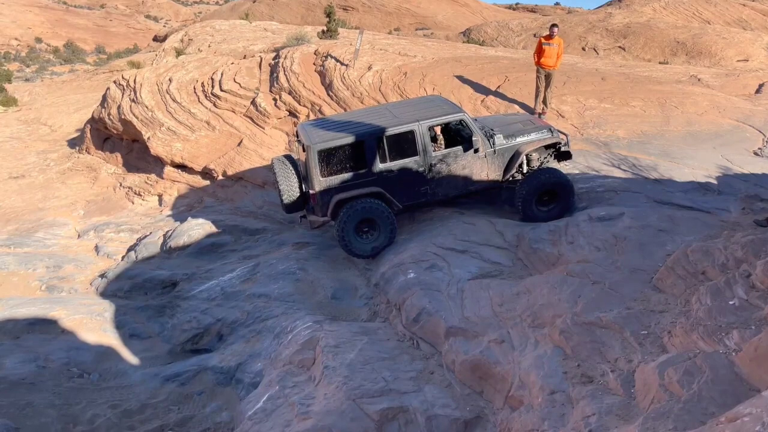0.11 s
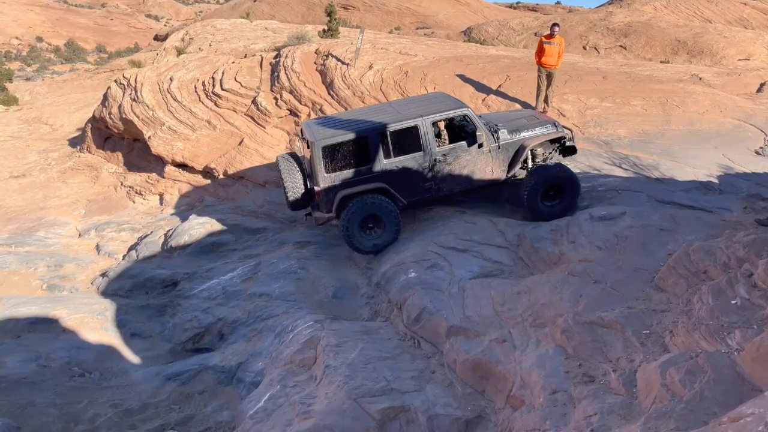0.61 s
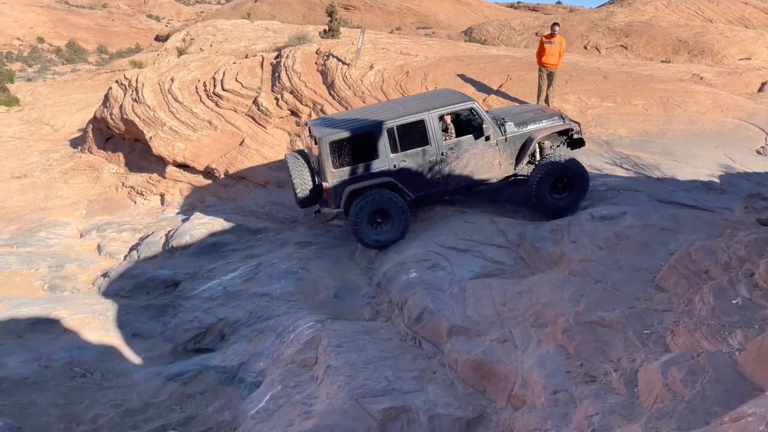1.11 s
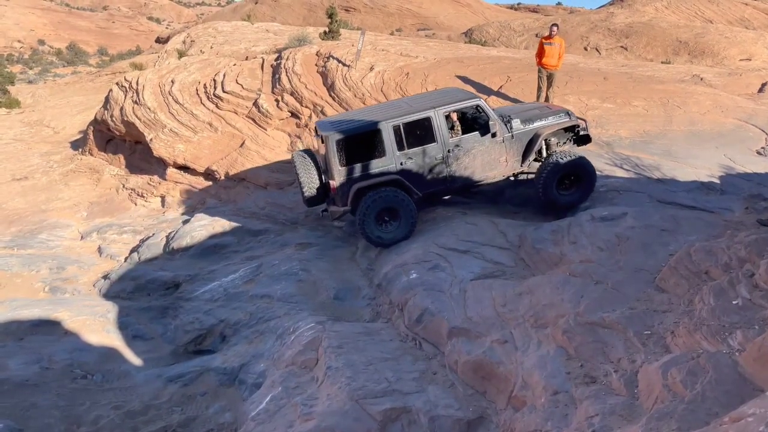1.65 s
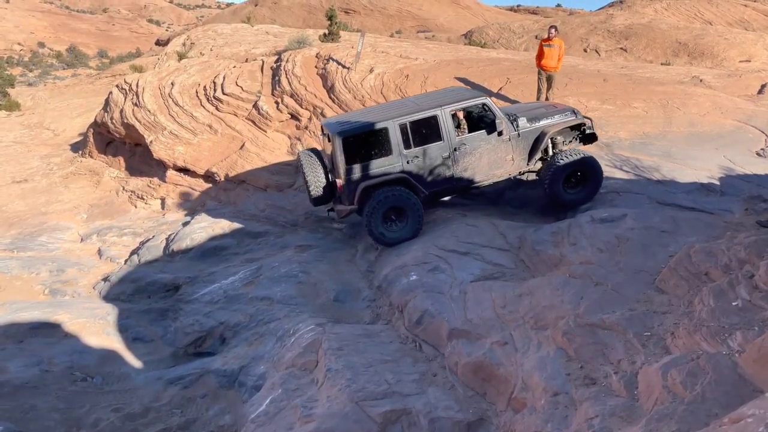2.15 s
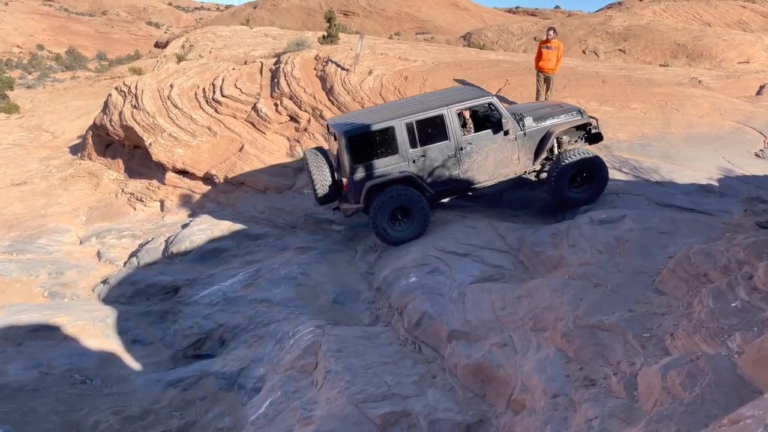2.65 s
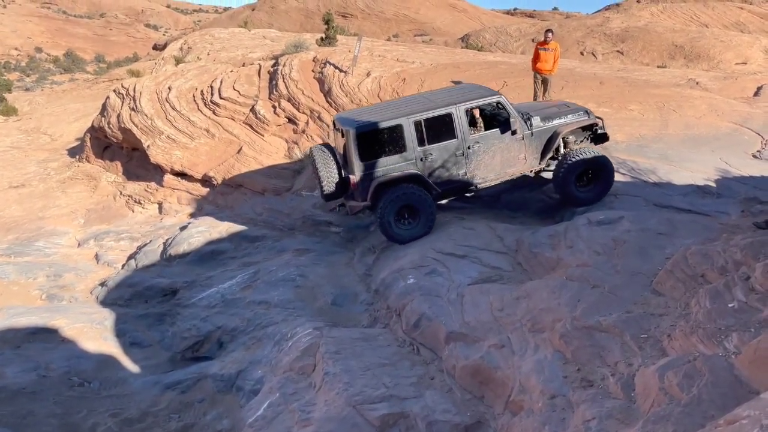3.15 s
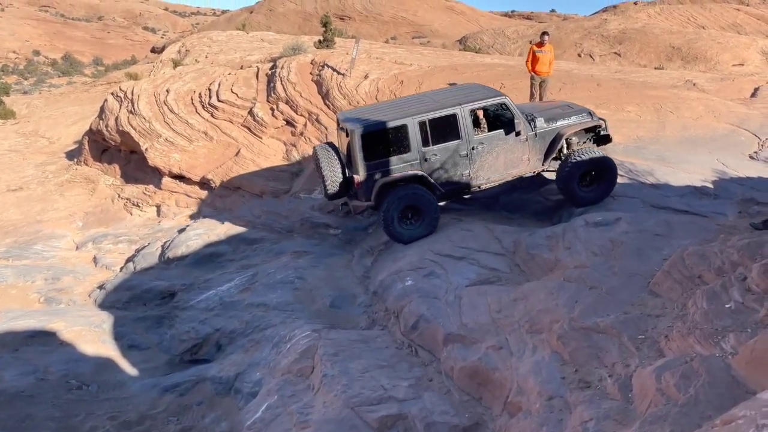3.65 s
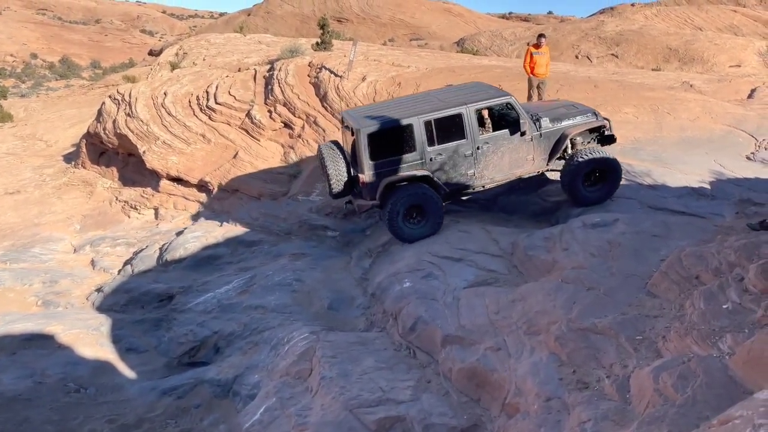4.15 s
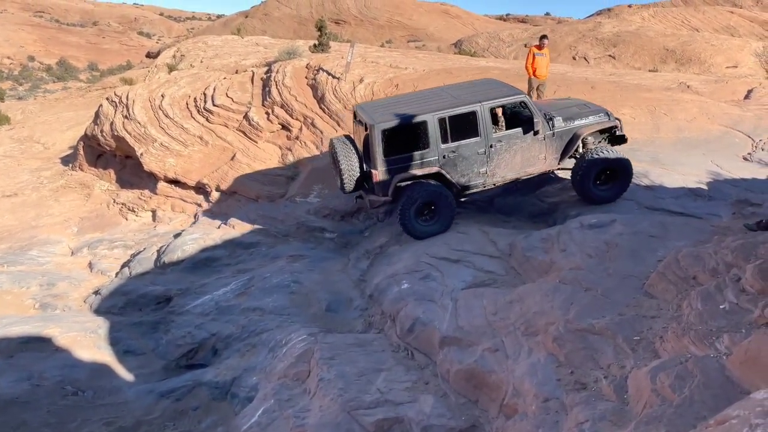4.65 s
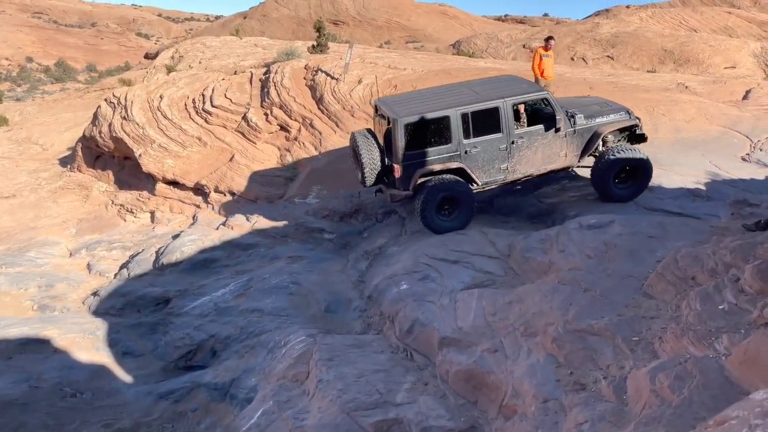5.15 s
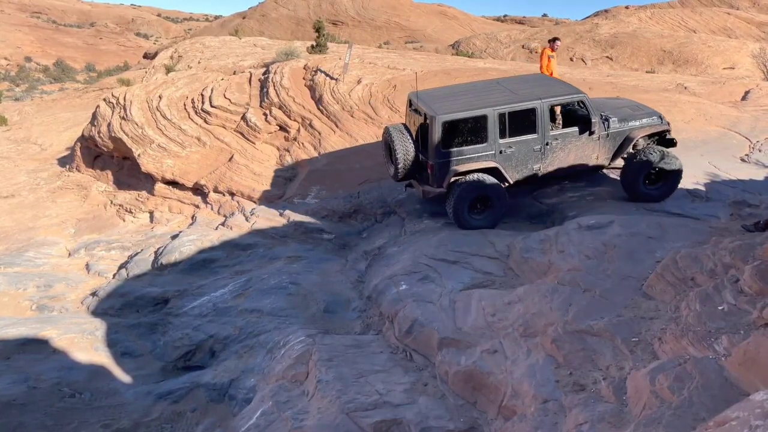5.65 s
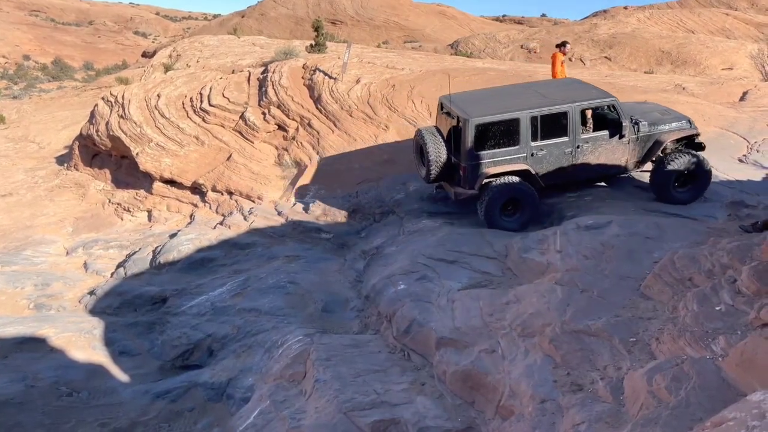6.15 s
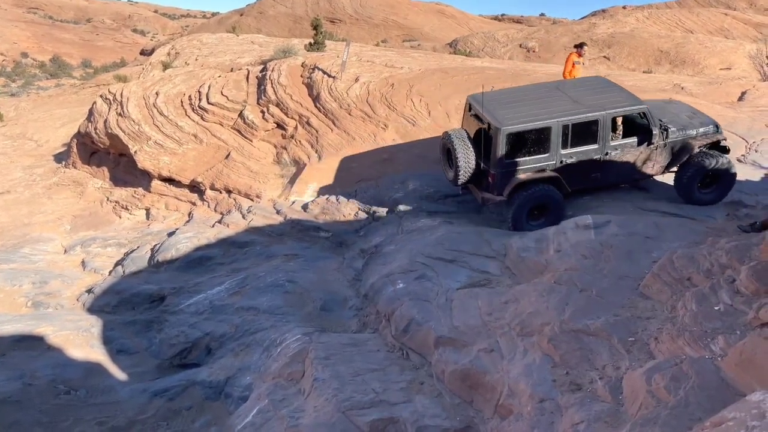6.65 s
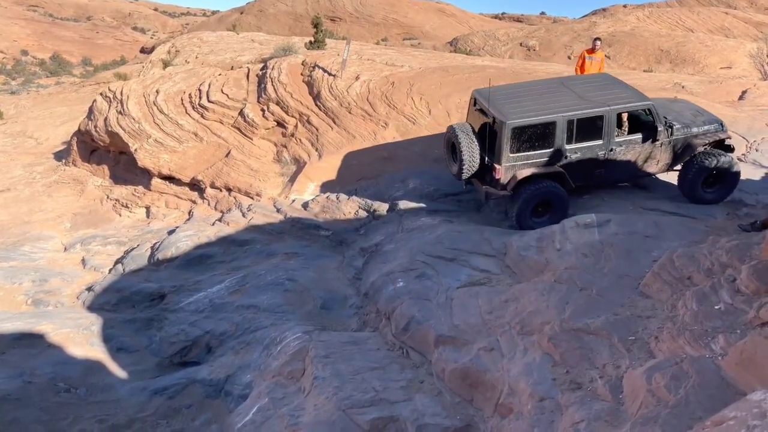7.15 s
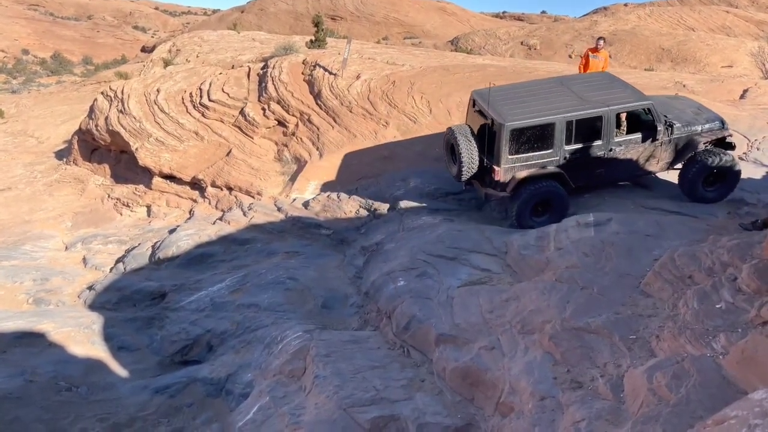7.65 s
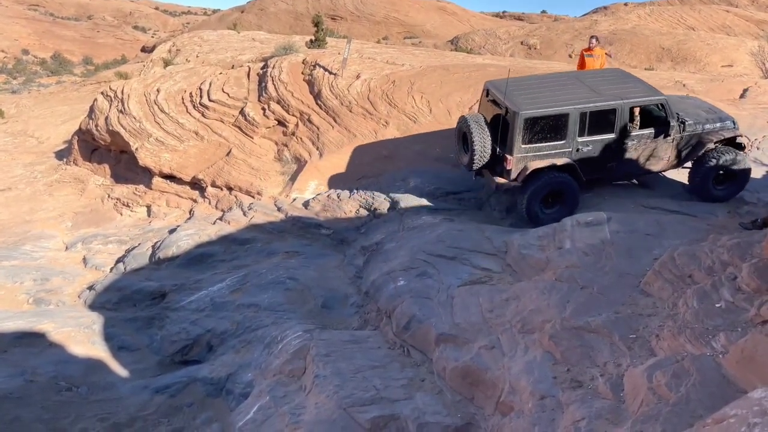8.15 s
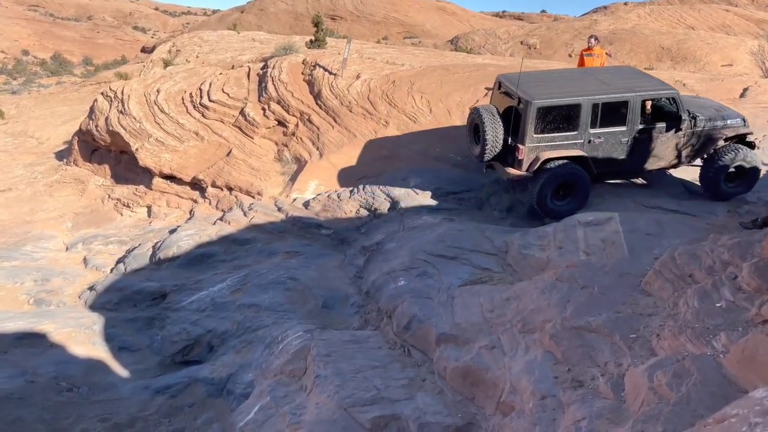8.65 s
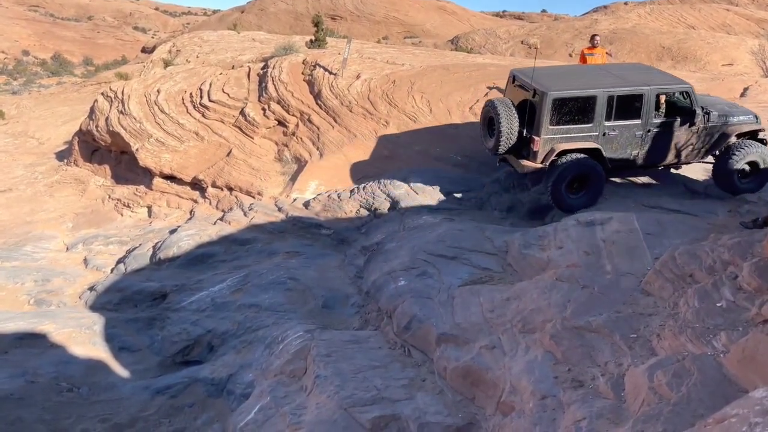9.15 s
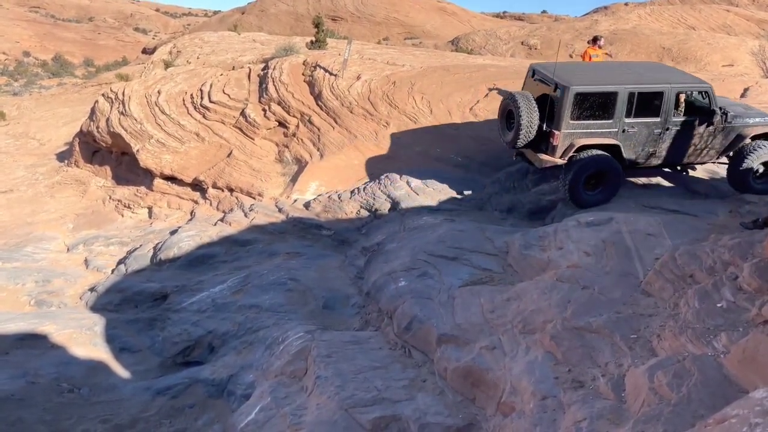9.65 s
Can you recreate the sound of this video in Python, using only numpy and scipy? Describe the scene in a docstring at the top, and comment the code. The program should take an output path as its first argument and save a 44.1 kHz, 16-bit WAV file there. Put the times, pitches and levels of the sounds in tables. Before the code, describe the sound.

Outdoors on open rock, an off-road vehicle labours with a deep, throbbing exhaust boom, engine whir and faint panel buzz. Wind thumps and flutters on the microphone. Near six seconds the boom dies away and the underbody knocks and scrapes rock, followed by small grit ticks. After a quieter gap the engine picks up again, lower in level, then eases off.

```python
"""An exhaust booms close by as a four-wheel drive labours up a rock ledge; it lifts off, clunks over, pulls again.
The boom, at twice the firing rate, and its fractions are sines locked to the crank. The engine bay whirs
in shaped noise and buzzing panels; contacts with the rock are noise bursts through the underbody's resonances,
grit ticks are short rough rings. Gusts of lumpy low noise buffet the two microphone ports, with single pops."""
import sys
import numpy as np
from scipy import signal
from scipy.fft import rfft, irfft, next_fast_len
from scipy.io import wavfile
from scipy.ndimage import uniform_filter1d, map_coordinates

SR = 44100
rng = np.random.default_rng(int(sys.argv[2]) if len(sys.argv) > 2 else 0)


def persist_wave(psi):
    """Save psi, clipped to +-1, as 16-bit WAV."""
    counts = np.round(np.clip(psi, -1, 1) * 32767).astype(np.int16)
    wavfile.write(sys.argv[1], SR, np.atleast_2d(counts).T)


def gain_from_db(level_db):
    """Turn a decibel level (scalar or array-like) into a linear amplitude factor."""
    decades = np.asarray(level_db, float) / 20
    return 10 ** decades


N = 431298

# driveline strain through the climb: t/s, level/dB
STRAIN = [(0, -1.5), (1.2, -7), (3.4, -2), (3.9, 1.5), (4.4, 2), (4.8, 0), (5.3, 2), (5.7, -2), (7.3, -9),
          (7.8, -5), (8.6, -7), (9.05, -9.5), (9.7, -2)]
# resonances of the underbody: f/Hz, width/Hz, relative level/dB
UNDERBODY = [(782, 25, 5), (950, 30, 4), (1615, 46, 0), (2340, 60, -0.5), (2600, 110, -6.5),
             (2894, 16, 1.5), (3270, 60, -8.5), (4070, 61, -7)]


def unit(x):
    """Scaled to rms 1."""
    return x / np.sqrt(np.mean(x ** 2) + 1e-20)


def along(points, hz):
    """Reads (f/Hz, value) points on a log frequency axis."""
    f, v = np.transpose(points)
    return np.interp(np.log(hz + 1), np.log(f + 1), v)


def curves(rows):
    """One value per sample for each column after the time."""
    s, *cols = np.transpose(rows)
    return [np.interp(np.arange(N) / SR, s, c) for c in cols]


def wobble(rate, step=1):
    """A random curve of straight pieces, rate knots a second, read at every step-th sample."""
    knots = rng.standard_normal(int(N * rate / SR) + 4)
    return map_coordinates(knots, [np.arange(0, N, step) * rate / SR], order=1)


def filtered(x, response):
    """x times a complex response of frequency."""
    m = next_fast_len(N + SR // 2)
    return irfft(rfft(x, m) * response(np.fft.rfftfreq(m, 1 / SR)), m)[..., :N]


def noise(spectrum, lumps=1):
    """Coloured noise of rms 1, its size modulated by lumps before the colouring."""
    return unit(filtered(lumps * rng.standard_normal(N), lambda hz: gain_from_db(along(spectrum, hz))))


def ports(mid, side):
    """Left and right from what the ports share and what they oppose."""
    return np.array([mid + side, mid - side])


def exhaust():
    """Sines locked to the crank: uneven cylinders put lines on the quarters of the boom, weaker ones on its twelfths."""
    # two pulls on the throttle, shut between them: t/s, boom f/Hz, load level/dB,
    # lope (half-rate line over the boom)/dB, unevenness of the cylinders/dB
    pulls = [(0, 124.4, -11, -11, -27), (0.27, 139.3, -11, -5.5, -27.5), (0.56, 138.7, -11, -6, -28),
             (1.2, 129.1, -10.5, -9.5, -30), (3.45, 130.9, -11.5, -10.5, -36),
             (3.8, 134.9, -12.5, -7, -21.5), (4.3, 136.2, -13, -3.5, -42), (4.8, 129.1, -13, -7, -34),
             (5.2, 133.4, -15.5, -4, -34.5), (5.45, 129.7, -17.5, 1, -27.5), (5.62, 114.9, -31, -1.5, -8.5),
             (5.72, 106.5, -76, -2.5, -13.5), (7.2, 68.75, -58.5, -18, -15), (7.3, 73.91, -11, -31.5, -36),
             (7.4, 98.07, -14, -20.5, -23.5), (7.52, 119.1, -14.5, -18, -27.5),
             (7.75, 135.4, -15, -1.5, -33.5), (7.95, 133.3, -19.5, -4.5, -15.5),
             (8.2, 130.1, -14, -18.5, -32.5), (8.58, 125.2, -14.5, -19, -27),
             (8.92, 116.1, -17.5, -17.5, -20), (9.25, 114.6, -20.5, -14, -16.5),
             (9.47, 111.2, -20, -12, -20), (9.65, 100.4, -41, -6.5, -20)]
    # pipe and body resonances: f/Hz, width/Hz, relative level/dB
    low_ring = [(483.7, 45, 0.98)]
    high_ring = [(556.6, 21, -1), (612.4, 21, 2), (1076, 35, -10.5)]
    # the pipe resonance near which the lines about 3x speak: f/Hz, width/Hz, relative level/dB
    triple_ring = [(401.7, 26, 0)]
    # a casing resonance that wakes with the gear whine: f/Hz, width/Hz, level under the load/dB
    casing_ring = [(678, 100, -42)]
    # lines of the whole engine cycle, twelve beats of the boom: f/twelfths of the boom, level against the load/dB
    cycle_lines = [(20, -37), (26, -41.5), (29, -41), (31, -39), (32, -41.5), (44, -43.5), (51, -42.5),
                   (56, -43)]

    step = 10  # the tones are computed on every tenth sample
    hz, load_db, lope_db, uneven_db, strain_db = (c[::step] for c in curves(pulls) + curves(STRAIN))
    clock = np.arange(0, N, step) / SR

    def drift(rate):
        return wobble(rate, step)

    turn = 2 * np.pi * np.cumsum(hz) * step / SR + 0.02 * drift(5.7)  # the crank speed flutters

    def line(k, db, shake):
        return np.sqrt(2) * gain_from_db(db) * np.sin(k * turn + shake + rng.uniform(0, 2 * np.pi))

    def unsteady(k):
        return line(k, 2 * drift(4), .025 * k * drift(20))  # higher orders smear more

    def ring(modes, f):
        return sum(gain_from_db(db) / (1 + (2 * (f - centre) / width) ** 2) for centre, width, db in modes)

    # the low resonance is loudest when the tailpipe faces the ports and fades either side, down to a floor
    faces_s, turns_db_per_s, hidden_db = 0.67, -11.5, -19
    facing_db = np.maximum(turns_db_per_s * np.abs(clock - faces_s), hidden_db)

    # boom, lope and the 1.5x line
    low = line(1, load_db + .5 * drift(20), 0.066 * drift(25))
    low += line(.5, load_db + lope_db + 1.2 * drift(15), .2 * drift(15))
    odd_db = -17.5 + 0.77 * strain_db  # against the load
    low += line(1.5, load_db + odd_db + 1.5 * drift(3) + drift(8), .15 * drift(12))
    # the 3x lines sink while the low resonance speaks
    triple_db = -31.5 - 0.41 * (facing_db - hidden_db)
    for k in [3, 37 / 12]:  # neighbours that beat once an engine cycle
        low += ring(triple_ring, k * hz) * line(k, load_db + triple_db + drift(6), .15 * drift(12))
    gear_order = 7.16  # gear teeth meshing for each beat of the boom
    gear_follows = 2.8  # dB for each dB of strain
    low += line(gear_order, load_db - 45 + gear_follows * strain_db + 2 * drift(12), .4 * drift(25))

    # a steady whine swells and fades late in the second pull
    start_s, end_s, whine_hz, whine_db = 9, 9.5, 608.5, -47
    progress = np.clip((clock - start_s) / (end_s - start_s), 0, 1)
    swell = np.sqrt(np.clip(np.sin(np.pi * progress), 0, 1))
    whine = np.sin(2 * np.pi * whine_hz * clock + 0.33 * drift(10))
    low += swell * gain_from_db(whine_db + drift(6.2)) * whine

    # the low tones start to the right and swing back by 3.4 s
    out = ports(low, -0.013 * np.maximum(3.4 - clock, 0) * low)

    # one cylinder bites harder: the upper growl swells once an engine cycle
    throb = unit(gain_from_db(5.5 * (1 + .4 * drift(4)) * np.sin(turn / 12 + .9 * drift(4))))
    sideways = .12  # scatter of each line between the ports
    muffler_hz = 339  # the growl is cut off above this
    for quarter in [3, 5, 7, 8, 9, 10, 11, *range(13, 36)]:
        k = quarter / 4
        growl = gain_from_db(load_db + uneven_db - 6.05 * (k - 1.9752)) * (k < 3)
        growl = growl / (1 + (k * hz / muffler_hz) ** 20)
        snarl = gain_from_db(-29.5 + facing_db) * ring(low_ring, k * hz)
        snarl += throb * gain_from_db(-37 + strain_db) * ring(high_ring, k * hz)
        snarl += throb * gain_from_db(gear_follows * strain_db) * ring(casing_ring, k * hz)
        tone = (growl + gain_from_db(load_db) * snarl) * unsteady(k)
        out += ports(tone, rng.normal(0, sideways) * tone)

    for twelfth, db in cycle_lines:
        k = twelfth / 12
        plain = gain_from_db(0.51 * strain_db - .6 * clock)  # sinks, in dB per s, as the car climbs away
        piped = gain_from_db(11.5 + facing_db) * ring(low_ring, k * hz)
        tone = gain_from_db(load_db + db) * (plain + piped) * unsteady(k)
        out += ports(tone, rng.normal(0, sideways) * tone)
    return signal.resample_poly(out, step, 1, axis=1)[:, :N]


def engine_bay():
    """Fan and intake rush below, valve-gear clatter above; underbody panels buzz as narrow bands of noise."""
    # engine bay loudness: t/s, level/dB
    whir = [(0, -48), (1.2, -49.5), (5.75, -50.5), (6.2, -52.5), (7.05, -57.5), (7.5, -52.5), (8.45, -52),
            (8.65, -49), (9, -49.5), (9.12, -53), (9.78, -52.5)]
    # spectrum of the fan and intake rush: f/Hz, relative level/dB per Hz
    rush_spectrum = [(200, -13), (400, -2.5), (650, -3.5), (850, -6.5), (1080, -6.5), (1400, -14),
                     (3000, -52)]
    # clatter heard alike by both ports: f/Hz, relative level/dB per Hz
    shared_clatter = [(800, -29.5), (1520, -2.5), (1910, -6.5), (2300, -3.5), (3530, -11.5), (4090, -11),
                      (7200, -19.5), (9300, -26.5), (12300, -25), (13800, -37)]
    # clatter heard opposite by the ports: f/Hz, relative level/dB per Hz
    opposed_clatter = [(1000, -3), (1400, -2), (4300, -13.5), (6450, -16.5), (8170, -15), (10200, -23.5),
                       (10500, -60), (12500, -58.5), (13000, -25.5), (13800, -19.5)]
    (whir_db,), (strain_db,) = curves(whir), curves(STRAIN)

    def patchy():
        return gain_from_db(wobble(14) + 1.3 * wobble(300))

    def panel(hz, width):
        return unit(filtered(rng.standard_normal(N), lambda f: 1 / (1 + (2 * (f - hz) / width) ** 2)))

    # the rush over the clatter follows the strain and sinks, in dB per s, as the nose climbs away
    rush_db = 7.5 + 0.21 * strain_db - 0.29 * np.arange(N) / SR + wobble(1.4)
    rush = gain_from_db(rush_db) * ports(noise(rush_spectrum, patchy()), gain_from_db(-8.0) * noise(rush_spectrum))
    clatter = ports(noise(shared_clatter, patchy()), gain_from_db(-0.5) * noise(opposed_clatter, patchy()))
    # each panel buzzes by fits
    rattle = sum(gain_from_db(-20.0 + db + 1.3 * wobble(3.6)) * panel(hz, width) for hz, width, db in UNDERBODY)
    return gain_from_db(whir_db) * (rush + clatter + rattle)


def steel(f):
    """The underbody's resonances as band-pass responses, neighbours in opposite phase."""
    return sum((-1) ** k * gain_from_db(db) * 1j * f * w / (c * c - f * f + 1j * f * w)
               for k, (c, w, db) in enumerate(UNDERBODY))


def knocks():
    """Each contact rubs noise into the ringing underbody; the harder it is, the more broad grit it adds."""
    # metal scrapes on the rock: t/s, burst level before the resonances/dB, scrape length/s
    scrapes = [(5.707, -34.5, 0.03), (5.872, -22.5, 0.035), (5.892, -24.5, 0.035), (5.931, -34, 0.04),
               (7.359, -37, 0.035), (7.522, -37, 0.022), (7.585, -35, 0.025)]
    # broad spectrum of the grinding: f/Hz, relative level/dB
    grit = [(300, -3.0), (1000, -0.5), (3000, -1.5), (4500, -5.5), (7300, -11.5), (9300, -33.0), (14000, -29.5)]
    blows, t = np.zeros((2, 2, N)), np.arange(SR // 4) / SR  # to the underbody, to the grit
    bite = gain_from_db(3 * wobble(500))  # the rock bites unevenly
    for s, db, length in scrapes:
        rise = np.clip(t / 0.009, 0, 1)
        fall = gain_from_db(-9 * (t / max(length, .004)) ** 2.6)
        shape = gain_from_db(db) * rise * fall
        at = round((s - .007) * SR)
        rub = shape * ports(rng.standard_normal(len(t)), 0.4 * rng.standard_normal(len(t)))
        rub = rub[:, :N - at] * bite[at:at + len(t)]
        blows[:, :, at:at + len(t)] += [rub, gain_from_db(0.46 * (db + 21)) * rub]
    ringing = filtered(blows[0], lambda f: gain_from_db(9) * steel(f))
    grinding = filtered(blows[1], lambda f: gain_from_db(along(grit, f)))
    return ringing + grinding


def clinks():
    """Each tick is a rough, noisy ring with a broad crack, both dying away together."""
    # grit ticks under the tyres: t/s, starting level of the decay/dB, f/Hz
    ticks = [(6.086, -43.5, 2306), (6.363, -39.5, 2316), (6.413, -36.5, 2600), (6.45, -42.5, 2146),
             (6.479, -39, 2310), (6.646, -41.5, 2490), (7.362, -36, 800)]
    t60_s, crack_db = 0.087, -6.5
    out, t = np.zeros((2, N)), np.arange(SR // 10) / SR
    rough = unit(wobble(900))
    for s, db, hz in ticks:
        at = round((s - .002) * SR)
        ring = rough[at:at + len(t)] * np.sin(2 * np.pi * hz * t)
        hiss = rng.standard_normal((2, len(t)))
        # two short running means soften the crack's top
        crack = 2 * gain_from_db(crack_db) * uniform_filter1d(uniform_filter1d(hiss, size=4), size=4)
        decay = gain_from_db(db - 60 * t / t60_s) * np.clip(t / .004, 0, 1)
        out[:, at:at + len(t)] += decay * (ring + crack)
    return out


def wind():
    """Lumpy buffeting, a faster flutter on top that swells in swirls, and single pressure pops inside the swirls."""
    # gust strength at the ports: t/s, level/dB
    gusts = [(0, -26.5), (1.3, -37), (1.7, -24), (2.5, -22.5), (2.8, -18), (4.45, -20), (4.8, -30),
             (5.15, -18), (5.5, -30), (5.9, -22.5), (6.05, -32), (6.37, -30.5), (6.44, -17), (6.62, -21.5),
             (6.76, -22.5), (7.05, -39.5), (7.25, -31), (7.55, -19), (8.3, -23), (8.9, -26.5), (9.05, -19),
             (9.6, -25), (9.78, -20.5)]
    # spectrum of the buffeting: f/Hz, relative level/dB per Hz
    buffet = [(20, -26.5), (60, 6), (90, 3.5), (135, 0), (250, -16.5), (500, -75.5)]
    # spectrum of the flutter: f/Hz, relative level/dB per Hz
    flutter = [(100, -21), (170, 2.5), (250, -1.5), (350, -5), (500, -13.5), (1200, -59.5)]
    # pressure pops on the ports: t/s, envelope peak level/dB, f/Hz
    pops = [(2.213, -18, 280), (2.284, -22.5, 301), (2.759, -20.5, 259), (2.816, -17.5, 304),
            (3.059, -21, 229), (3.25, -21.5, 246), (3.555, -13, 328), (3.638, -13, 464),
            (3.772, -14.5, 268), (4.052, -19, 258), (4.098, -29, 555), (4.242, -19, 242),
            (4.441, -23.5, 221), (5.306, -31, 495), (5.759, -11.5, 204), (5.871, -17.5, 268),
            (5.9, -17.5, 172), (5.985, -22, 151), (6.405, -16, 195), (6.423, -15.5, 561),
            (6.44, -11, 124.6), (6.465, -13, 188), (6.479, -10.5, 229), (6.486, -19, 620), (7.36, -27, 330),
            (7.557, -21.5, 303.2), (7.885, -18.5, 263), (7.923, -23.5, 355), (7.99, -22, 330),
            (8.051, -21, 298), (8.152, -24.5, 454), (8.174, -12.5, 257), (8.195, -28.5, 622),
            (9.725, -27, 247)]
    gust_db, = curves(gusts)

    def lumps():
        return gain_from_db(1.6 * wobble(14))

    out = gain_from_db(gust_db) * ports(noise(buffet, lumps()), gain_from_db(-9.5) * noise(buffet, lumps()))

    # the flutter swells with every pop, 14.5 dB under its peak
    clock = np.arange(N) / SR
    rise_s, fall_s = .012, .016  # half widths
    power = 0
    for s, db, hz in pops:
        distance = (clock - s) / np.where(clock < s, rise_s, fall_s)
        power = power + gain_from_db(db - 14.5) ** 2 / (1 + distance ** 2) ** 2
    swirls = np.sqrt(power)
    steady = gain_from_db(-43.5 + 0.27 * (gust_db - gust_db.mean()))  # follows the gusts weakly
    for level in [steady, swirls]:
        eddies = gain_from_db(4 * wobble(40))
        out += level * ports(noise(flutter, eddies), gain_from_db(-7.5) * noise(flutter, eddies))

    t = np.arange(-SR // 20, SR // 20) / SR
    for (s, db, hz), (phase, tilt) in zip(pops, rng.uniform(-1, 1, (len(pops), 2))):
        pop = gain_from_db(db) * np.exp(-(t * hz / 0.63) ** 2) * np.cos(2 * np.pi * hz * t + np.pi * phase)
        at = round((s + .003) * SR) - SR // 20  # each pop centres 3 ms after its swirl
        out[:, at:at + len(t)] += ports(pop, 0.34 * tilt * pop)[:, :N - at]
    return out


def scene():
    """Everything that reaches the two ports, eased in over the first 4 ms."""
    ease = np.clip(np.arange(N) / SR / .004, 0, 1)
    return ease * (exhaust() + engine_bay() + knocks() + clinks() + wind())


def band_limit(x):
    """A steep low-pass at the top of the band."""
    return signal.sosfilt(signal.butter(12, 13950, fs=SR, output="sos"), x)


def record(dry):
    """The camera body shades and delays the ports; a soft ceiling rounds the peaks."""
    # left against right at the ports: f/Hz, left over right level/dB, phase by which left leads/rad
    shade = [(60, -1, 0.15), (133, -1.4, 0.14), (280, -0.5, 0.37), (604, -0.5, 0.14), (1730, 0, -0.81),
             (2900, 0, 0.32), (4100, 2, 0.9), (6000, 0, 0.16)]
    hz, tilt_db, lead = np.transpose(shade)

    def half(f, values):
        return np.outer([.5, -.5], along(np.transpose([hz, values]), f))

    x = filtered(dry, lambda f: gain_from_db(half(f, tilt_db)) * np.exp(1j * half(f, lead)))
    x = x / (1 + np.abs(x / .95) ** 6) ** (1 / 6)  # soft ceiling
    return band_limit(x)


dry = scene()
out = record(dry)
persist_wave(out)
```